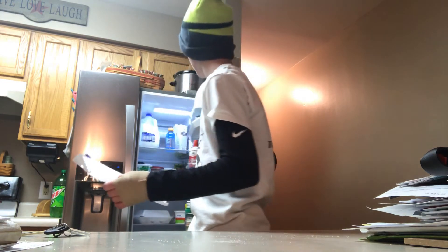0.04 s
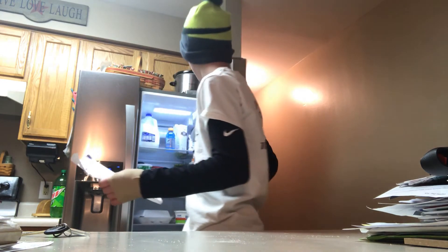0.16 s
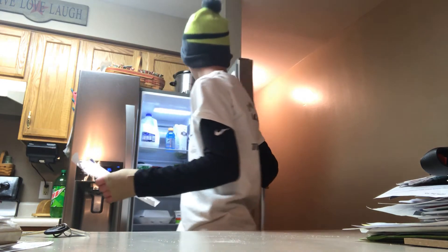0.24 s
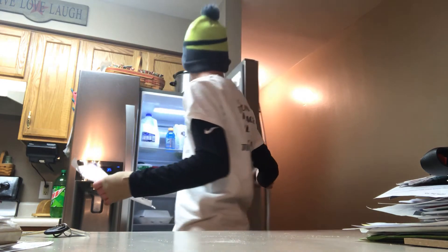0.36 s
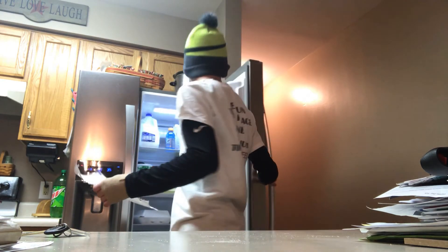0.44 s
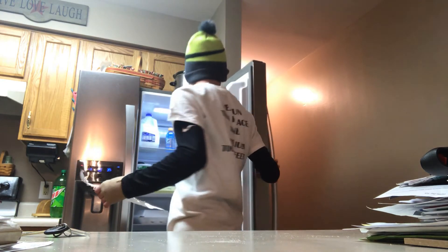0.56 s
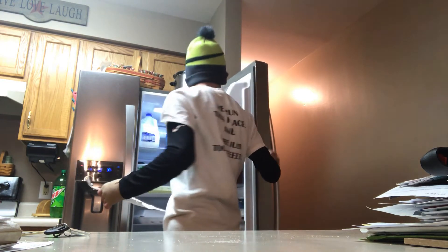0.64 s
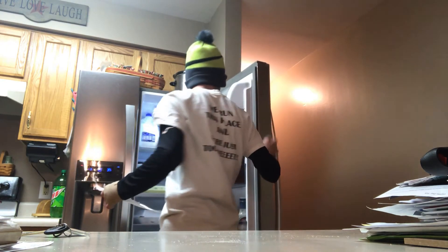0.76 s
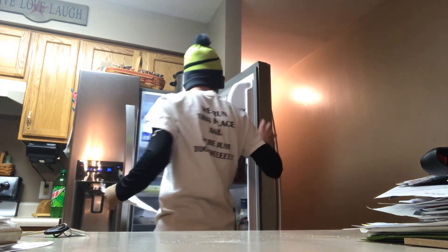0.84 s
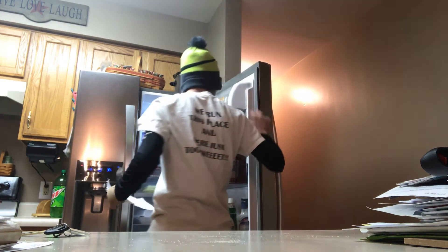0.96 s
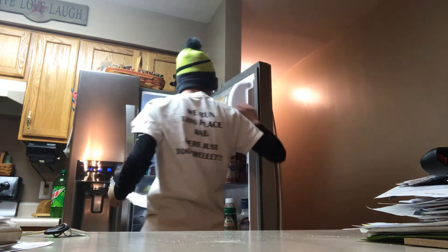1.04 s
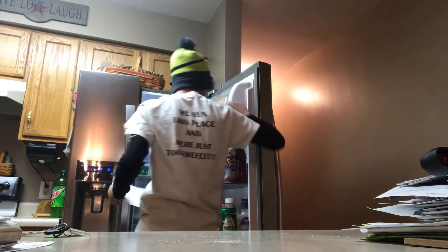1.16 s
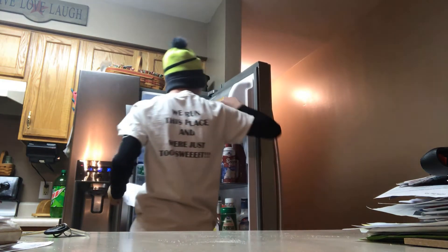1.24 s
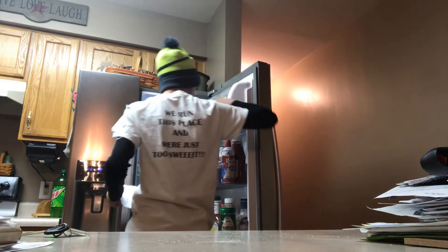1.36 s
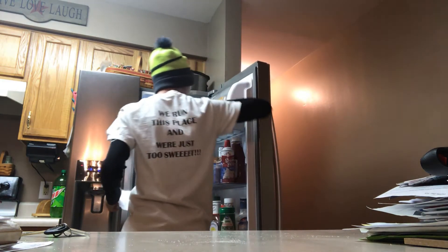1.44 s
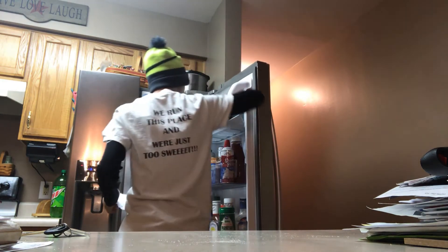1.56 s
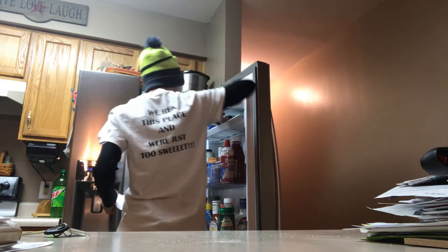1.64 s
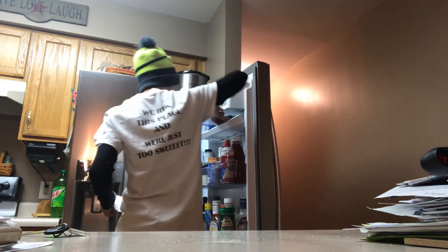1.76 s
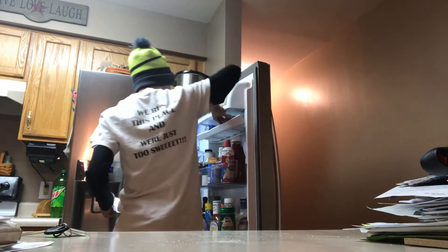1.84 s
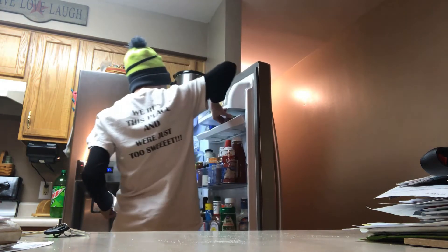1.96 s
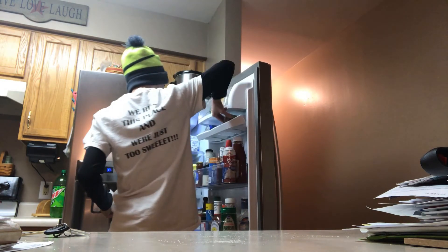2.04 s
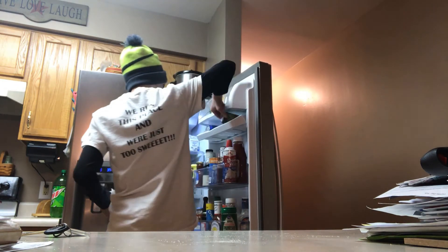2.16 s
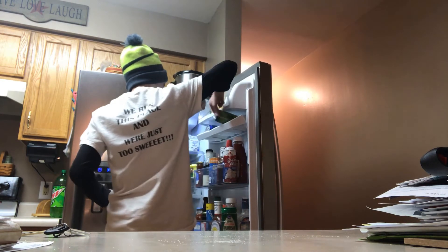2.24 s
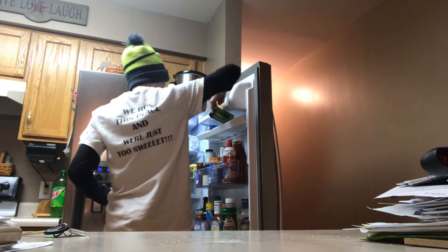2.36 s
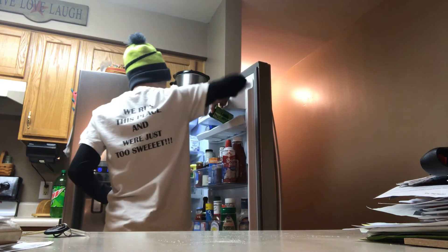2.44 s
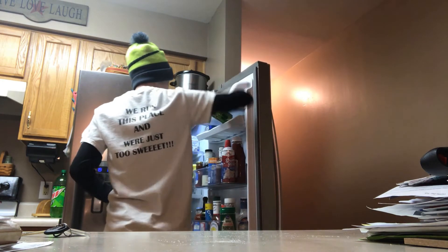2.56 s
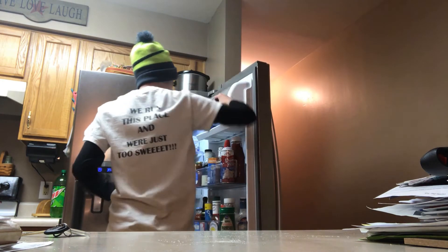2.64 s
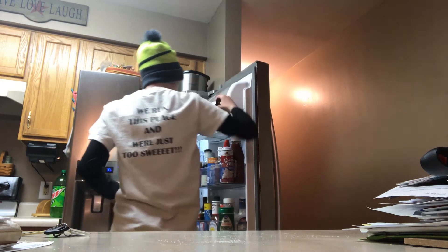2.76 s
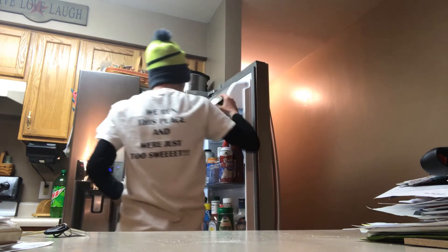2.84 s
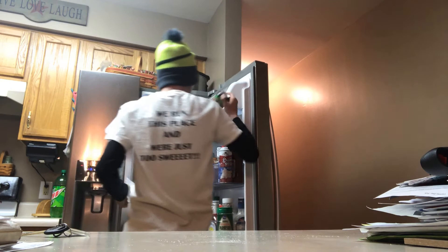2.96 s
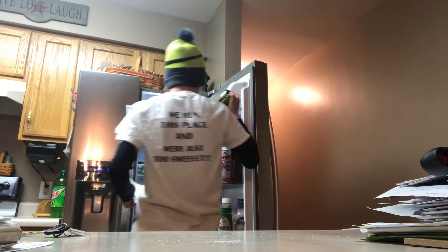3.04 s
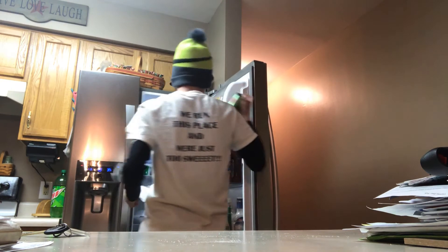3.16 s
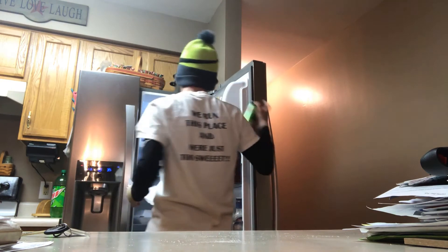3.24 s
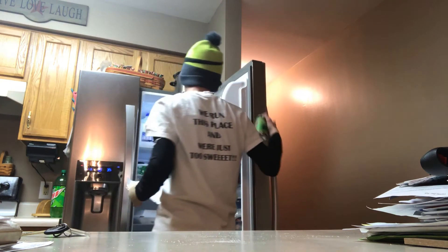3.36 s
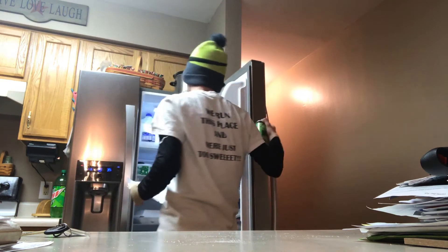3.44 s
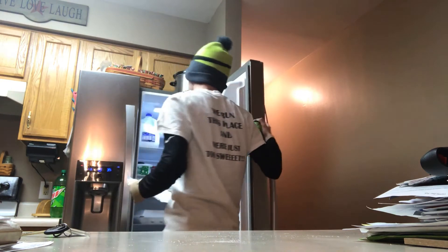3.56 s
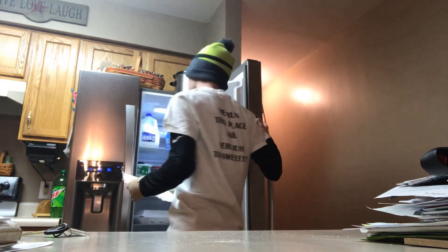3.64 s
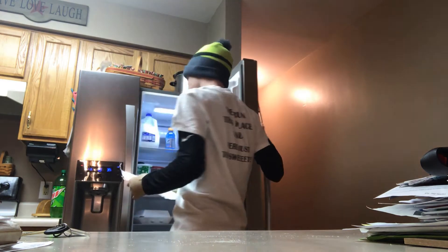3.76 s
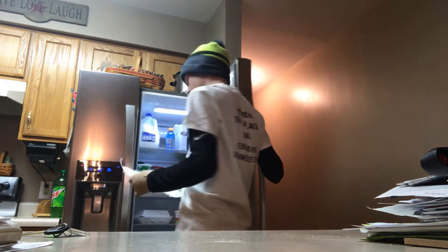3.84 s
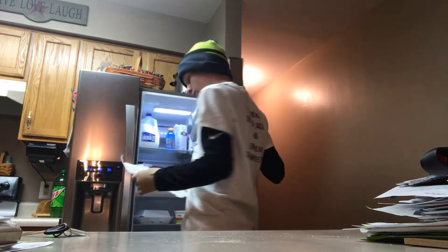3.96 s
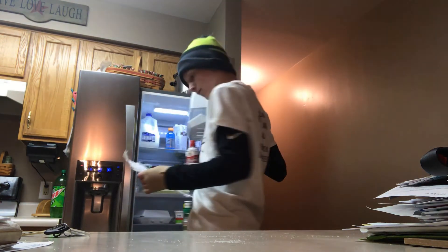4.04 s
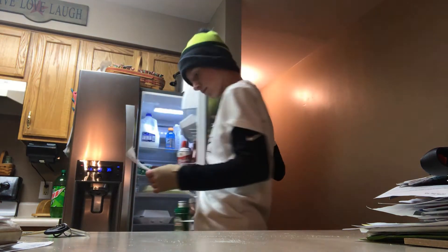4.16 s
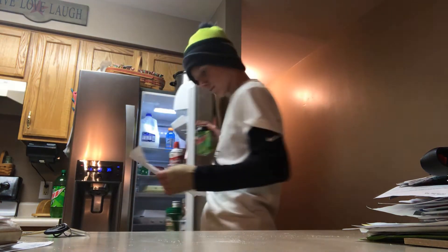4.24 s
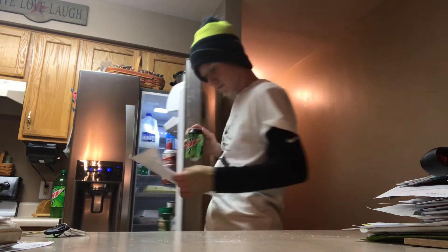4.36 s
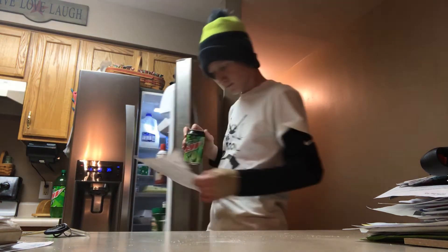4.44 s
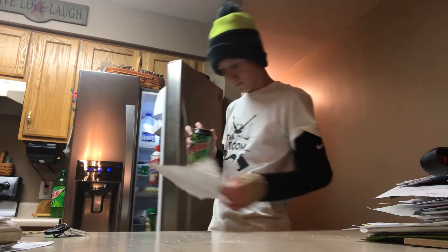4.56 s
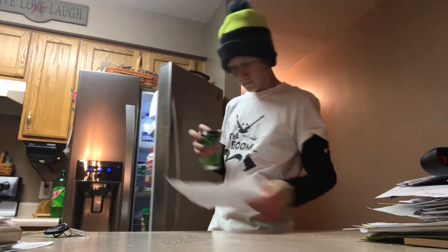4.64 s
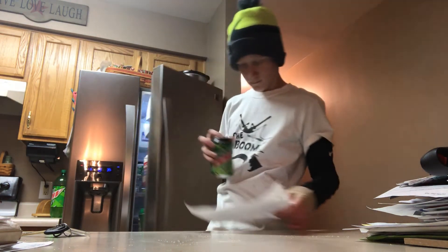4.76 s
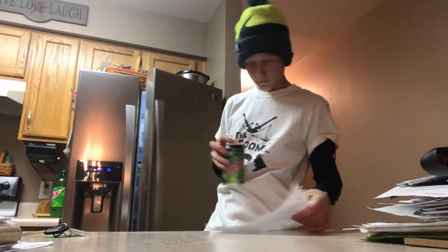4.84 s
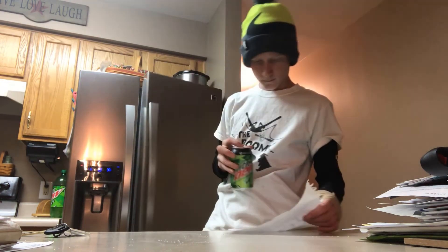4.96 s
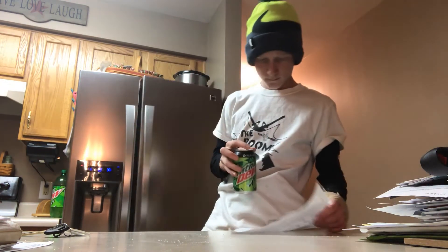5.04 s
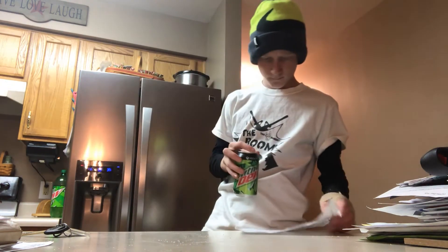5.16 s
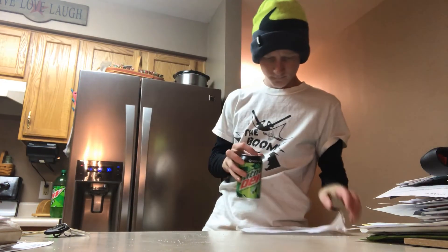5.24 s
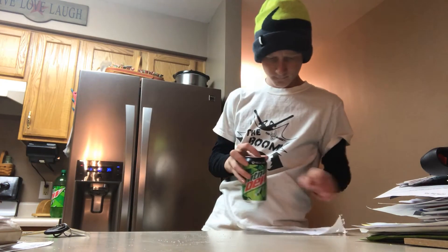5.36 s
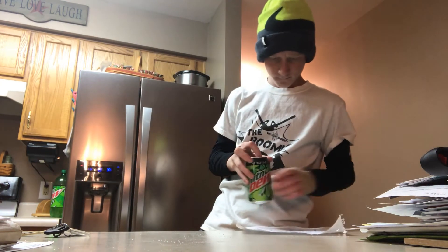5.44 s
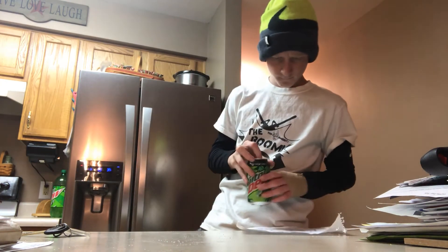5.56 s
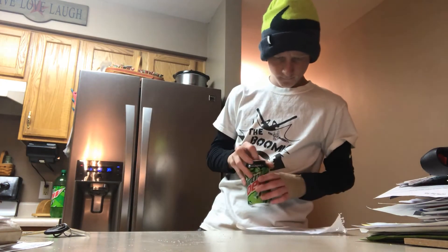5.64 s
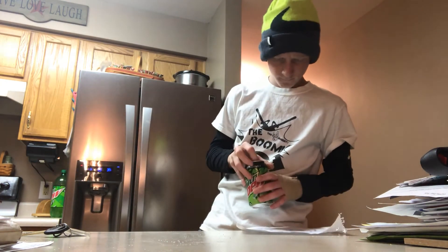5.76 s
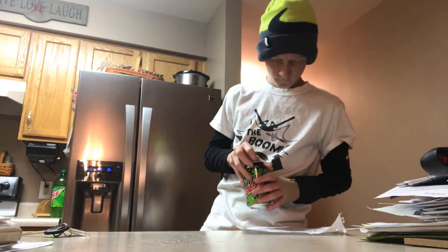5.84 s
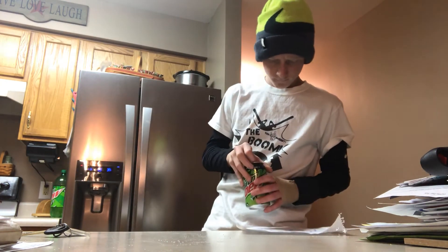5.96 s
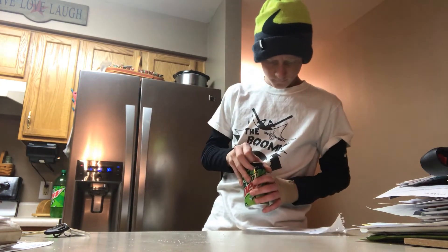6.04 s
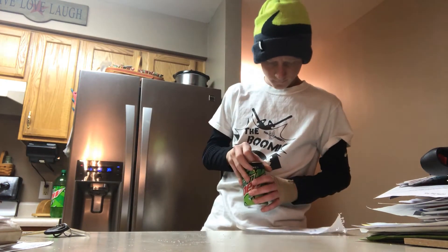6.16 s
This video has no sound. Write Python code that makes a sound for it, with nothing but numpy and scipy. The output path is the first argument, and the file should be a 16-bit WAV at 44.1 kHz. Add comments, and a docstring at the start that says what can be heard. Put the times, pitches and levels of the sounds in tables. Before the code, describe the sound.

A quiet refrigerator hum with faint hiss runs throughout a small kitchen with short echo. From 0 to 1 s, soft footfalls, cloth and dry paper rustle mix with light hollow taps. At 1.17 s a strong plastic shelf knock stands out, then a weaker one near 1.6. Between 2.05 and 2.35 s bottles and cans clatter in a rapid cluster of knocks and scrapes. Shuffling and brushing continue around 2.6 to 3.3 s, with a firm knock at 3.58. Paper moves quietly near 4 s. From 4.5 s the door rubs in small jerks, with crisp ticks around 4.87. At 5.2 s it shuts: a slap, click, full thump and low boom, bouncing at 5.3. The load rattles, glass rings faintly and the cabinet groans, fading towards 5.9. At 6.0 s a can cracks sharply, metallic and bright, with a brief gassy hiss; the tab pops near 6.18.

```python
"""A refrigerator's low hum and hiss and someone's shuffling with a sheet of paper open a scene in a small kitchen;
soon bottles and cans knock on the plastic shelves. The door swings, thumps shut and shakes its load; then a soda
can cracks open and hisses. Struck bodies are sums of damped modes, with puffs of noise for scraping and rattling;
movement, friction and escaping gas are coloured noise under level curves. Each hit excites the kitchen's echo."""
import sys
import numpy as np
from scipy import signal
from scipy.fft import rfft, irfft, next_fast_len
from scipy.io import wavfile
from scipy.ndimage import map_coordinates

SR = 44100
rng = np.random.default_rng(int(sys.argv[2]) if len(sys.argv) > 2 else 0)


def log_audio(samples):
    """Write samples as a 16-bit WAV file to the path given in sys.argv[1]."""
    # one column per channel
    frames = np.atleast_2d(samples).T
    # limit to full scale, then quantise
    limited = np.clip(frames, -1, 1)
    pcm = np.round(limited * 32767).astype(np.int16)
    wavfile.write(sys.argv[1], SR, pcm)


def magnitude_from_level(level_db):
    """Linear magnitude for a level in decibels (20 dB per decade)."""
    exponent = np.asarray(level_db, float) / 20
    return 10 ** exponent


N = 273464
T = np.arange(SR * 3 // 5) / SR  # clock of a single hit [s]
SLOW = np.arange(0, N / SR, .001)  # clock of the level curves [s]

# refrigerator and room floor, spectral density: pitch_hz [Hz], level_db [dB per Hz]
FLOOR_SPECTRUM = [(15, -48), (25, -3.5), (58, 4.5), (102, 2), (376, -8.5), (665, -13.5), (972, -9),
                  (1420, -13.5), (2650, -27), (5820, -27), (10300, -36), (15000, -29), (16300, -60)]
FLOOR_DB = -70
# decay of the kitchen's echo: pitch_hz [Hz], t60_s [s]
KITCHEN_DECAY = [(100, 0.78), (400, 0.35), (1500, 0.38), (4000, 0.32), (12000, 0.27)]
# rustle of the paper, showing how busy the hands are: time_s [s], level_db [dB]
RUSTLE = [(0, -96), (.28, -83), (.43, -74), (.72, -83.5), (1.0, -67), (1.15, -76.5), (1.4, -72), (2, -77.5),
          (2.76, -73.5), (2.95, -71), (3.1, -78.5), (3.3, -74.5), (3.47, -77), (3.85, -87), (3.95, -74),
          (4.1, -81), (4.27, -89), (4.35, -73), (4.48, -87.5), (5.02, -70), (5.19, -74)]
FOOT_OVER_RUSTLE_DB, CLOTH_OVER_RUSTLE_DB = -3.5, 1.5  # steady shuffle and cloth
# footfalls: crest_s [s], level_db [dB], rise_s [s]
FOOTFALLS = [(.04, -68.5, 0.11), (.25, -58.5, 0.056), (.56, -72.5, 0.076), (1.04, -55, 0.087),
             (1.5, -68.5, 0.14), (1.75, -62.5, 0.038), (1.9, -59.5, 0.14), (2.05, -60, 0.037),
             (2.68, -64, 0.1), (2.93, -53.5, 0.076), (3.0, -60, 0.043), (3.08, -61, 0.069),
             (3.455, -63, 0.025), (3.86, -67, 0.033)]
# brushes of cloth: crest_s [s], level_db [dB], rise_s [s]
CLOTH_BRUSHES = [(.05, -67.5, 0.1), (.18, -65, 0.038), (1.1, -68, 0.12), (1.85, -63.5, 0.058),
                 (2.7, -66, 0.69), (2.95, -73, 0.21), (3.05, -59.5, 0.055), (3.12, -61, 0.15),
                 (3.28, -68.5, 0.068), (3.72, -64, 0.11), (4.189, -62.5, 0.071), (5.185, -51.5, 0.07)]
RISE_DB = 15  # climb of a swell within its rise time
STEP_FALL_DB_PER_S, BRUSH_FALL_DB_PER_S = 145, 163
FOOT_LUMPS_DB, GRIT_DB = 2.2, 3.3  # uneven shuffle; small taps inside rubbing and rattling
# resonances of foot on floor, then of cloth: pitch_hz [Hz], width_hz [Hz], level_db [dB]
FOOT_RESONANCES = [(201, 30, 4), (336, 60, 4.5), (573, 140, -6)]
CLOTH_RESONANCES = [(1050, 670, 2.5), (1390, 120, -3), (2300, 1500, -20)]
# spectral density of paper: pitch_hz [Hz], level_db [dB per Hz]
PAPER_SPECTRUM = [(880, -17.5), (1500, -9.5), (2250, -13), (4120, -14.5), (13400, -27.5), (16000, -30.5)]
# knocks on the shelves: start_s [s], level_db [dB], centre_hz [Hz], scrape_db [dB over the ring],
# spread_semitones [semitones]
SHELF_KNOCKS = [(0.193, -48, 336, -34, 10), (0.453, -40.5, 340, -25, 14.5), (0.739, -51, 340, -38, 4.5),
                (0.962, -50, 607, -20, 10), (1.028, -40.5, 406, -16.5, 17), (1.165, -19.5, 550, -18, 6.3),
                (1.589, -35.5, 670, -31, 17), (1.84, -43, 300, -25, 17), (2.056, -45.5, 1490, -6.5, 6.5),
                (2.087, -33, 1800, 5, 17), (2.096, -25.5, 338, -26, 6.4), (2.134, -35.5, 179, -12, 6.7),
                (2.171, -28, 388, -6.5, 8.5), (2.189, -24.5, 770, -12, 17), (2.223, -38.5, 180, -29, 2.5),
                (2.261, -22.5, 994, -18.5, 3.2), (2.266, -21.5, 440, -28, 5.3), (2.312, -25, 466, -15, 11),
                (2.517, -50.5, 1720, 4.5, 6.4), (2.633, -44.5, 388, -17, 13), (2.886, -41, 1520, -7, 17),
                (2.907, -49.5, 1060, -30, 2.4), (3.536, -42.5, 700, -2.5, 8), (3.577, -23, 510, -20, 12.3),
                (4.787, -52.5, 603, -27, 9.1), (4.886, -40, 323, -8.5, 17), (5.151, -41, 500, -14, 8.5),
                (5.478, -35, 836, -37, 2.6), (5.747, -50, 690, -32, 4.8), (5.802, -39.5, 690, -33, 4.7)]
# modes of shelves and door bins: pitch_hz [Hz], level_db [dB], t60_s [s]
SHELF_MODES = [(184.2, -6, 0.17), (238.4, -4, 0.13), (352.2, 0, 0.09), (395.6, -0.5, 0.061),
               (560, 1.5, 0.059), (734, -1, 0.048), (821, 5, 0.033), (1021, 4, 0.054),
               (1198.5, 12.5, 0.022), (1383, 3, 0.074), (1600, 7, 0.039)]
RATTLE_WIDTH_HZ = 90  # how loosely a rattling load follows the shelf modes
# spectral density of scraping: pitch_hz [Hz], level_db [dB per Hz]
SCRAPE_SPECTRUM = [(880, -43), (1500, -2.5), (3030, -8), (3380, -8), (4200, -8.5), (4590, -16),
                   (5490, -14.5), (16000, -34.5)]
# bright ticks of paper and can: start_s [s], level_db [dB], centre_hz [Hz], spread_octaves [octaves]
BRIGHT_TICKS = [(0.513, -53, 6900, 2), (1.16, -36, 1600, 1.9), (1.494, -51.5, 3750, 0.61),
                (1.59, -44, 2630, 0.48), (1.893, -54, 4260, 0.59), (2.133, -45, 13500, .4),
                (2.189, -42, 13000, 0.4), (2.35, -55, 12000, 0.38), (2.516, -51.5, 12100, 0.27),
                (2.831, -59, 8150, 1.2), (2.97, -60, 4500, 0.13), (3.278, -57, 5330, 0.18),
                (3.29, -59, 11000, 0.51), (3.4494, -60, 13500, 0.68), (3.694, -58.5, 3310, 0.16),
                (4.1757, -59.5, 12000, 1), (4.3257, -55, 4420, 0.24), (4.6102, -58, 2700, 0.64),
                (4.6867, -53.5, 2900, 0.62), (4.858, -38.5, 6940, 2.1), (4.874, -43, 6000, 1.7),
                (4.887, -35.5, 3430, 0.73), (5.003, -55.5, 10800, 0.77), (5.209, -39, 13000, 0.28),
                (5.519, -50.5, 6000, 0.46), (5.518, -51.5, 3100, 0.037), (5.636, -62, 2250, .1),
                (5.794, -62, 2800, 0.26)]
# glass bottles and cans set ringing: start_s [s], level_db [dB], pitch_hz [Hz]
GLASS_RINGS = [(2.43, -72, 1907), (2.517, -65.5, 1880), (3.75, -74, 1900), (4.328, -81, 4470),
               (5.31, -54, 1998), (5.333, -63, 4440), (5.41, -63, 1923), (5.6, -77, 3730),
               (5.655, -76, 3716)]
# a split mode of glass: ratio [multiple of the pitch], level_db [dB], t60_s [s]
SPLIT_MODE = [(1, 7, 0.31), (1.021, -5.5, 0.17)]
# hinge and bins rubbing in jerks: grip_s [s], level_db [dB], held_s [s]
HINGE_JERKS = [(4.525, -59.5, 0.062), (4.64, -55.5, 0.077), (4.792, -55.5, .27), (5.08, -51.5, 0.046),
               (5.16, -51.5, 0.046)]
JERK_RISE_S, JERK_FALL_DB_PER_S = 0.026, 168
# resonances of the swinging door and bins: pitch_hz [Hz], width_hz [Hz], level_db [dB]
SWING_RESONANCES = [(238, 154, -3), (340, 45, 3.5), (495, 17, 5.5), (591, 23, 1), (893, 96, -7.5),
                    (1470, 25, -7)]
# the door meets its frame, first the seal's edge, then the blow and its bounces:
# start_s [s], thump_db [dB], slap_db [dB], magnet_strip_click_db [dB]
DOOR_CONTACTS = [(5.183, -49, -39, -64.5), (5.2034, -20, -15, -15), (5.213, -19.5, -21, -38),
                 (5.295, -34, -32, -30.5)]
# modes of the door panel: pitch_hz [Hz], level_db [dB], t60_s [s]
PANEL_MODES = [(143, 4.5, 0.13), (249, 9.5, 0.047), (328, 4.5, 0.081), (487, -4, 0.26), (693, 7, 0.067),
               (827, -2, 0.061), (1002, 2.5, 0.06)]
# spectral density of the seal's slap: pitch_hz [Hz], level_db [dB per Hz]
SLAP_SPECTRUM = [(180, -44), (300, -7.5), (713, -3.5), (1610, -13), (1900, -22), (2520, -19), (3950, -22.5),
                 (16000, -42.5)]
# modes of the steel edge: pitch_hz [Hz], level_db [dB], t60_s [s]
EDGE_MODES = [(2380, 3, 0.0087), (2510, -1, 0.013), (7760, -0.5, 0.0017)]
# air squeezed in the cabinet: pitch_hz [Hz], level_db [dB], t60_s [s]
CABINET_AIR_MODES = [(54, 2, 0.2), (65, 1, 0.19)]
BOOM_DB = -20
# the cabinet rocks after the blow, groaning: crest_s [s], level_db [dB]
CABINET_ROCKS = [(5.26, -36.5), (5.4, -38.5), (5.45, -39.5), (5.51, -42), (5.56, -46), (5.665, -42.5),
                 (5.755, -52.5), (5.811, -46), (5.98, -53.5)]
ROCK_RISE_S, ROCK_FALL_DB_PER_S, ROCK_SHAKE_DB = 0.038, 155, -18
RATTLE_S, RATTLE_DB, RATTLE_FALL_DB_PER_S = 5.273, -40, 39  # crest of the load's rattle, and its decay
# resonances of the groan, then of the rattling load: pitch_hz [Hz], width_hz [Hz], level_db [dB]
GROAN_RESONANCES = [(65.6, 14, -3.5), (161.8, 16.3, 6.5), (242, 89, -6.5)]
RATTLE_RESONANCES = [(359, 43, -1), (565, 170, -0.5), (830, 300, -8), (1176, 134, -7.5)]
# cracks of the can's seal: start_s [s], level_db [dB]
SEAL_CRACKS = [(6.0038, -16.5), (6.0097, -27), (6.013, -39), (6.018, -34), (6.0263, -41)]
# modes of the can's lid: pitch_hz [Hz], level_db [dB], t60_s [s]
LID_MODES = [(3050, 5, 0.012), (3740, 17.5, 0.0053), (4470, 6, 0.0088), (6000, 5.5, 0.011),
             (8900, -4, 0.014), (11700, -17, 0.01), (14300, -9, 0.0087)]
# pop of the tab: start_s [s], level_db [dB]
TAB_POPS = [(6.175, -20.5)]
# modes of the tab: pitch_hz [Hz], level_db [dB], t60_s [s]
TAB_MODES = [(1494, 6, 0.02), (2900, -8.5, 0.012)]
# stages of escaping gas: full_flow_s [s], level_db [dB], rise_s [s], held_s [s], fall_db_per_s [dB per s]
GAS_SPURT = (6.008, -40.5, .004, .014, 400)
GAS_RUSH = (6.04, -48, .03, .095, 250)
GAS_HISS = (6.058, -38, .03, .07, 230)
# spectral density of the gas jet: pitch_hz [Hz], level_db [dB per Hz]
GAS_SPECTRUM = [(700, -15.5), (2380, -14), (4040, -4), (7690, 4), (9600, 1), (11200, 5.5), (12600, -2),
                (14200, 8), (15600, 0), (16300, -46)]
# dip of the microphone's port: centre_hz [Hz], width_hz [Hz], depth [0-1]
PORT_DIP = (10500, 350, .6)


def unit(x):
    """Normalisation by energy: scales to rms 1."""
    return x / np.sqrt(np.mean(x ** 2) + 1e-20)


def peak(x):
    """Normalisation by crest: scales to peak 1."""
    return x / (np.abs(x).max() + 1e-20)


def along(points, hz):
    """Logarithmic pitch scale: interpolates (Hz, value) points along it."""
    point_hz, value = np.transpose(points)
    return np.interp(np.log(hz + 1), np.log(point_hz + 1), value)


def colour(spectrum):
    """Spectral envelope: gain of frequency from (Hz, dB) points."""
    return lambda hz: magnitude_from_level(along(spectrum, hz))


def through(resonances):
    """Resonance: gain of frequency as a sum of peaks with steep skirts."""
    def gain(hz):
        total = 0
        for centre_hz, width_hz, db in resonances:
            detuning = (centre_hz * centre_hz - hz * hz) / (hz + 1) / width_hz
            total = total + magnitude_from_level(db) / (1 + detuning ** 2) ** 0.68
        return total
    return gain


def wobble(rate):
    """Slow fluctuation: a smooth random curve with rate knots a second."""
    knots = rng.standard_normal(int(N * rate / SR) + 4)
    return map_coordinates(knots, [np.arange(N) * rate / SR])


def noise(gain, size=N, grit_db=0):
    """Filtered noise of rms 1; grit makes a few of its grains stand out as taps."""
    m = next_fast_len(size)
    grain_db = grit_db * np.minimum(rng.exponential(size=m), 6)
    grains = rng.standard_normal(m) * magnitude_from_level(grain_db)
    coloured = irfft(rfft(grains) * gain(np.fft.rfftfreq(m, 1 / SR)), m)
    return unit(coloured[:size])


def lumpy(db, gain, rate, depth_db, grit_db=0):
    """Amplitude modulation: coloured noise under a level curve, in uneven lumps."""
    level_db = np.interp(np.arange(N) / SR, SLOW, db) + depth_db * wobble(rate)
    return magnitude_from_level(level_db) * noise(gain, grit_db=grit_db)


def swell(crest_s, db, rise_s, held_s, fall_db_per_s):
    """Exponential growth and decay: a level in dB that climbs to a crest, holds and falls."""
    t = SLOW - crest_s
    climb_db = RISE_DB * np.minimum(t / rise_s, 0)
    fall_db = fall_db_per_s * np.maximum(t - held_s, 0)
    return np.maximum(db + climb_db - fall_db, -140)


def summed(levels_db):
    """Incoherent addition: the powers of several levels summed, in dB."""
    return 10 * np.log10(sum(10 ** (db / 10) for db in levels_db))


def onset(contact_s):
    """Finite contact time: a hit's force sets in exponentially."""
    return 1 - np.exp(-T / contact_s)


def ring(modes, contact_s, scatter_db, weight=lambda hz: 1):
    """Modal synthesis: damped sines at new strengths, rising over the contact time; peak 1."""
    hz, db, t60_s = np.transpose(modes)[..., None]
    strength = magnitude_from_level(db + scatter_db * rng.standard_normal(hz.shape)) * weight(hz)
    damped = strength * magnitude_from_level(-60 * T / t60_s) * np.sin(2 * np.pi * hz * T)
    return peak(damped.sum(0) * onset(contact_s))


def burst(gain, t60_s):
    """Impulsive friction: a puff of coloured noise that dies by 60 dB in t60_s."""
    return noise(gain, size=len(T)) * magnitude_from_level(-60 * T / t60_s) / 2


def add(out, start_s, sound, room_db):
    """Reverberation: lays in a sound with its own draw of decaying, frequency-dependent echo."""
    hz, t, z = signal.stft(rng.standard_normal(len(T)), SR, nperseg=256)
    decay = magnitude_from_level(-60 * t / along(KITCHEN_DECAY, hz)[:, None])
    tail = signal.istft(z * decay, SR, nperseg=256)[1][:len(T)]
    tail = tail * np.clip(T / 0.0023, 0, 1)  # walls answer after a short path, so the echo fades in
    echo = signal.fftconvolve(sound, tail / np.linalg.norm(tail))[:len(T)]
    out[round(start_s * SR):][:len(T)] += sound + magnitude_from_level(room_db) * echo


def refrigerator_floor():
    """Stationary noise: the refrigerator's hum and hiss as slowly wavering coloured noise."""
    return magnitude_from_level(FLOOR_DB + 1.7 * wobble(4.75)) * noise(colour(FLOOR_SPECTRUM))


def person():
    """Friction noise: feet, cloth and paper, each swelling with movement."""
    time_s, rustle_db = np.transpose(RUSTLE)
    paper_db = np.interp(SLOW, time_s, rustle_db, -120, -120)
    steps = [swell(*row, 0, STEP_FALL_DB_PER_S) for row in FOOTFALLS]
    brushes = [swell(*row, 0, BRUSH_FALL_DB_PER_S) for row in CLOTH_BRUSHES]
    foot_db = summed([paper_db + FOOT_OVER_RUSTLE_DB] + steps)
    cloth_db = summed([paper_db + CLOTH_OVER_RUSTLE_DB] + brushes)
    feet = lumpy(foot_db, through(FOOT_RESONANCES), 40, FOOT_LUMPS_DB, GRIT_DB)
    cloth = lumpy(cloth_db, through(CLOTH_RESONANCES), 45, 0.72, GRIT_DB)
    paper = lumpy(paper_db, colour(PAPER_SPECTRUM), 60, 0.91)
    return feet + cloth + paper


def knocks(out):
    """Impact excitation: a blow favours shelf modes near its centre, rattles the load and scrapes."""
    shelf = through([(hz, RATTLE_WIDTH_HZ, db) for hz, db, t60_s in SHELF_MODES])
    for start_s, db, centre_hz, scrape_db, spread_semitones in SHELF_KNOCKS:
        def near(hz):
            distance = 12 * np.log2(hz / centre_hz + 1e-9)
            return 1 / (1 + (distance / spread_semitones) ** 2)

        def rattle_gain(hz):
            return near(hz) * shelf(hz) / (1 + (hz / 1700) ** 4) / (1 + (150 / (hz + 1)) ** 4)

        contact_s = 0.00093 * magnitude_from_level(-.35 * db)  # gentle blows stay in touch longer
        modes = ring(SHELF_MODES, contact_s, 1.5, near)
        rattle = 0.64 * burst(rattle_gain, 0.13) * onset(contact_s)
        scrape = magnitude_from_level(scrape_db) * burst(colour(SCRAPE_SPECTRUM), 0.12) * onset(0.0011)
        add(out, start_s, magnitude_from_level(db) * (modes + rattle + scrape), room_db=-4.0)


def ticks(out):
    """Sudden buckling: paper creases and can dents, each a snap and a longer puff round a centre."""
    for start_s, db, centre_hz, spread_octaves in BRIGHT_TICKS:
        def band(hz):
            return np.exp(-.5 * (np.log2(hz / centre_hz + 1e-9) / spread_octaves) ** 2)

        snap = burst(band, 0.026)
        puff = 0.6 * burst(band, 0.092)
        add(out, start_s, magnitude_from_level(db) * (snap + puff), room_db=-7.0)


def glass(out):
    """Mode splitting: bottles and cans ring in pairs of close pitches that beat."""
    for start_s, db, pitch_hz in GLASS_RINGS:
        modes = np.multiply(SPLIT_MODE, [pitch_hz, 1, 1])
        add(out, start_s, magnitude_from_level(db) * ring(modes, 0.0024, 3.7), room_db=5.0)


def door_swing():
    """Stick and slip: hinge and bins rub in jerks through the door's resonances."""
    rub_db = summed([swell(grip_s, db, JERK_RISE_S, held_s, JERK_FALL_DB_PER_S)
                     for grip_s, db, held_s in HINGE_JERKS])
    return lumpy(rub_db, through(SWING_RESONANCES), 60, 2.2, GRIT_DB)


def door_shut(out):
    """Collision: the seal slaps, the steel edge clicks, the panel thumps and the cabinet air booms."""
    for start_s, thump_db, slap_db, click_db in DOOR_CONTACTS:
        thump = magnitude_from_level(thump_db) * ring(PANEL_MODES, 0.00069, 2.8)
        slap = magnitude_from_level(slap_db) * burst(colour(SLAP_SPECTRUM), 0.07)
        click = magnitude_from_level(click_db) * ring(EDGE_MODES, 0.000061, 1.3)
        add(out, start_s, thump + slap, room_db=-2.5)
        add(out, start_s, click, room_db=-5)
    boom_s = DOOR_CONTACTS[1][0] + 0.0031  # just after the main blow
    add(out, boom_s, -magnitude_from_level(BOOM_DB) * ring(CABINET_AIR_MODES, 0.0037, 0), room_db=-14.0)


def cabinet_settling():
    """Rocking after a blow: the cabinet groans, and its load rattles and dies away."""
    groan_db = summed([swell(crest_s, db, ROCK_RISE_S, 0, ROCK_FALL_DB_PER_S) for crest_s, db in CABINET_ROCKS])
    load_db = swell(RATTLE_S, RATTLE_DB, ROCK_RISE_S, 0, RATTLE_FALL_DB_PER_S)
    rattle_db = summed([groan_db + ROCK_SHAKE_DB, load_db])  # each rock shakes the load again
    groan = lumpy(groan_db, through(GROAN_RESONANCES), 35, 0.95)
    return groan + lumpy(rattle_db, through(RATTLE_RESONANCES), 60, 2.2, GRIT_DB)


def can(out):
    """Fracture: the lid tears in a few ringing cracks, then the tab pops."""
    for start_s, db in SEAL_CRACKS:
        puff = 0.28 * burst(colour(GAS_SPECTRUM), 0.018)
        add(out, start_s, magnitude_from_level(db) * (ring(LID_MODES, 0.00043, 2.9) + puff), room_db=-12.5)
    for start_s, db in TAB_POPS:
        scrape = 0.14 * burst(colour(SCRAPE_SPECTRUM), 0.11)
        add(out, start_s, magnitude_from_level(db) * (ring(TAB_MODES, 0.00041, 0) + scrape), room_db=-11.5)


def gas():
    """Jet turbulence: a spurt and low rush, then a high hiss, with uneven spits of foam."""
    def low_gain(hz):
        return colour(GAS_SPECTRUM)(hz) / (1 + (hz / 7000) ** 6)

    def high_gain(hz):
        return colour(GAS_SPECTRUM)(hz) - low_gain(hz)

    spurt_db = swell(*GAS_SPURT)
    low = lumpy(summed([spurt_db, swell(*GAS_RUSH)]), low_gain, 400, 0.92)
    high = lumpy(summed([spurt_db - 18, swell(*GAS_HISS)]), high_gain, 400, 1.1)
    opened = np.arange(N) / SR > SEAL_CRACKS[0][0]
    return (low + high) * opened


def scene():
    """Superposition: hits in the kitchen over movement, gas and the refrigerator."""
    hits = np.zeros(N + SR)
    for source in (knocks, ticks, glass, door_shut, can):
        source(hits)
    movement = person() + door_swing() + cabinet_settling()
    return (refrigerator_floor() + movement + hits[:N] + gas())[None]


def roll_off(x):
    """The treble ends steeply here."""
    return signal.sosfilt(signal.butter(12, 16100, fs=SR, output="sos"), x)


def record(dry):
    """Microphone response: drops the deepest bass, and its port has a narrow dip in the treble."""
    hz = np.fft.rfftfreq(N, 1 / SR)
    centre_hz, width_hz, depth = PORT_DIP
    s = 1j * hz / 32  # bass corner at 32 Hz
    bass_cut = (s * s * s / (s + 1) / (s * s + s + 1)) ** 2
    port = 1 - depth / (1 + ((hz - centre_hz) / width_hz) ** 2)
    mix = irfft(rfft(dry) * port * bass_cut, N)
    return roll_off(mix)


dry = scene()
out = record(dry)
log_audio(out)
```